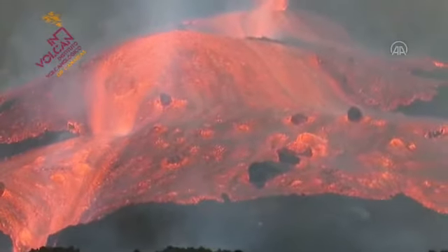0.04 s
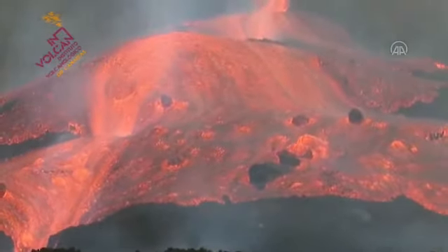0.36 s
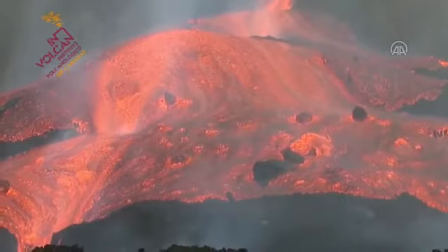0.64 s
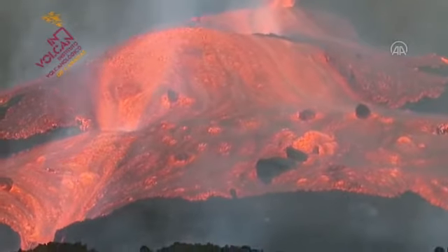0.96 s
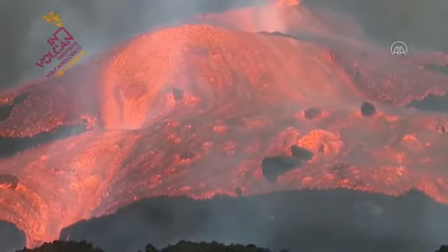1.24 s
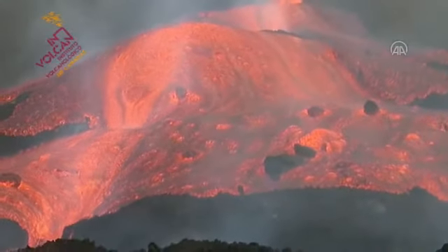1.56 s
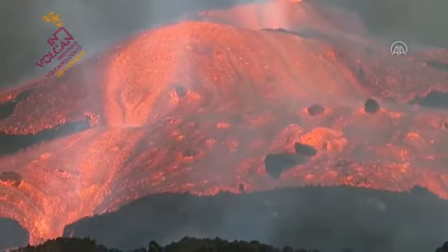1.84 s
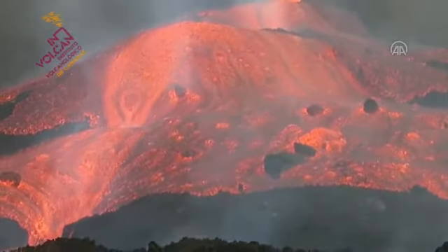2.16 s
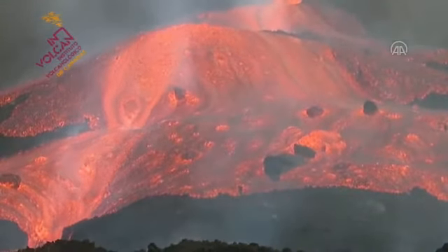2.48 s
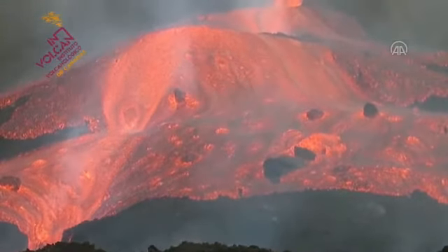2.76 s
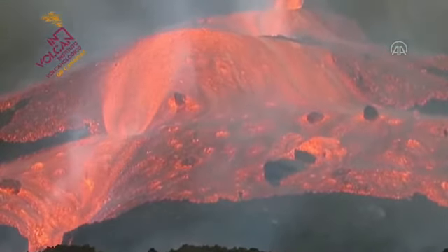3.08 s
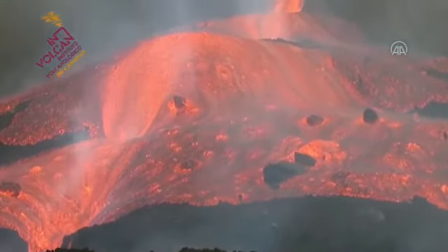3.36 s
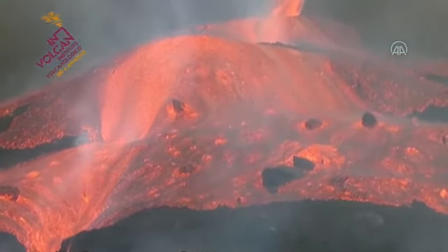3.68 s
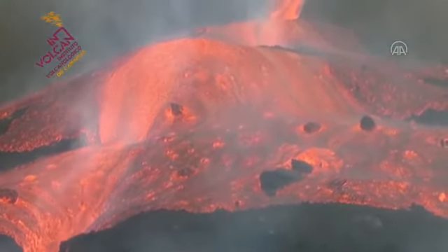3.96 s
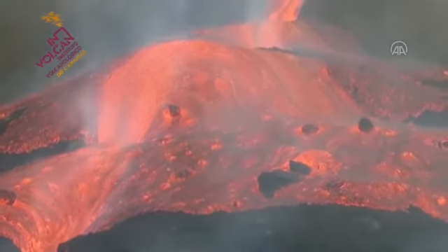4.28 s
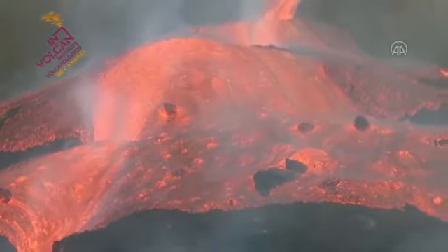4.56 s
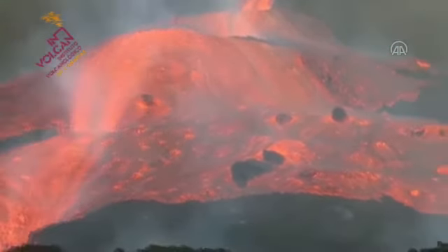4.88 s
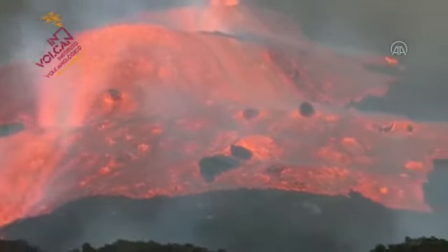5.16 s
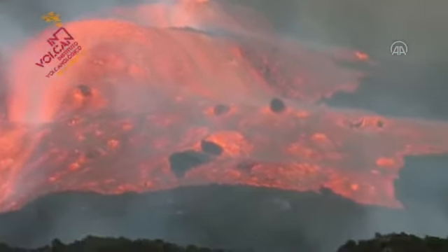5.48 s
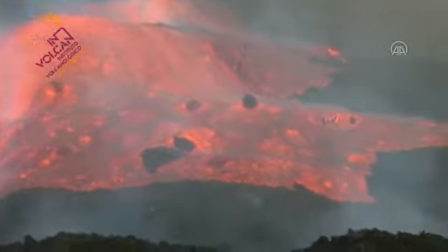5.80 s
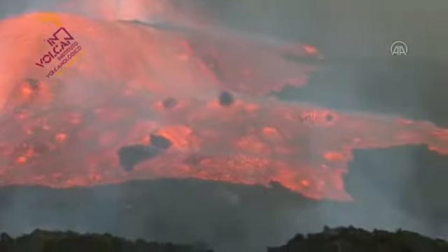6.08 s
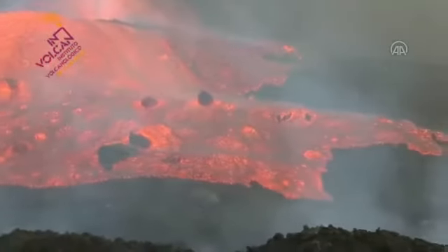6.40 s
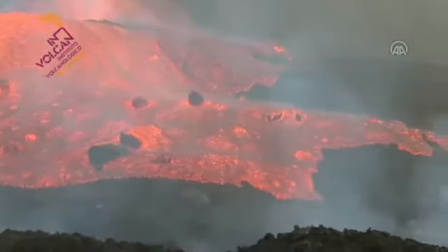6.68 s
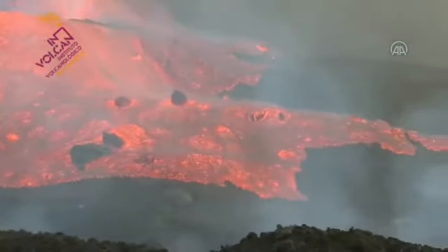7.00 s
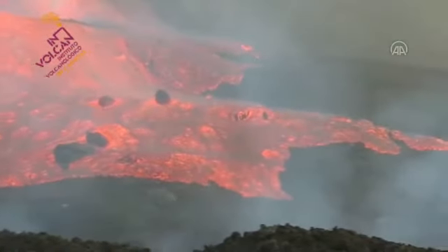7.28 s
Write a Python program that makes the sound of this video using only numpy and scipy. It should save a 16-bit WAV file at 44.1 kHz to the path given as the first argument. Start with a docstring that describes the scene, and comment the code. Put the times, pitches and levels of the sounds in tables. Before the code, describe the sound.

A distant volcano roars in uneven surges over a steady low rumble and thin hiss, with faint dry ticks close by.

```python
"""Across a valley, far from a volcanic vent behind a lava flow, a gas jet is heard roaring in surges.
Its turbulence carries small shocks: large eddies boom, middling ones roar and fine ones rasp. The air
absorbs the treble, and reflections cancel narrow bands. A steady rumble and a thin hiss lie beneath.
Close by, small fractures give faint dry ticks and one gritty snap. Three pressure pulses sound as
soft low thumps, two of them in the lull between surges."""
import sys
import numpy as np
from scipy import signal
from scipy.fft import rfft, irfft
from scipy.io import wavfile

SR = 44100
rng = np.random.default_rng(int(sys.argv[2]) if len(sys.argv) > 2 else 0)


def master_out(mix):
    """Clip the mix to full scale and print it as 16-bit PCM to the path in sys.argv[1]."""
    frames = np.transpose(np.atleast_2d(mix))
    ceiling = np.clip(frames, -1, 1)
    pcm = np.round(ceiling * 32767).astype(np.int16)
    wavfile.write(sys.argv[1], SR, pcm)


N = 332514
TIME, FREQS = np.arange(N) / SR, np.fft.rfftfreq(N, 1 / SR)

# Smooth spectrum of the jet after air absorption: frequency_hz, relative_db
JET_SPECTRUM = [(50, -22.5), (122, -11.5), (160, -4.5), (190, 1.5), (280, 1.1), (420, 3), (560, 3.5),
                (780, -2), (920, -3), (1200, -5), (1700, -14), (2350, -18), (3550, -29), (3900, -37.5),
                (5200, -47), (9000, -84.5)]
# Notches where reflections cancel the direct sound: centre_hz, width_hz, depth_db
INTERFERENCE_DIPS = [(225, 28, 4), (336.6, 54, 6.5), (464, 22, 2.5), (611, 16, 2.5), (740, 68, 4),
                     (1043.5, 79, 7.5), (1547, 62, 3.5), (1917, 110, 2), (2750, 91, 1.5), (3220, 49, 8)]
# Gushes of gas: crest_s, roar_db, swell_s, fade_s, boom_over_roar_db, rasp_over_roar_db
GAS_SURGES = [(0, -32, .2, 1, 1.8, -3), (.735, -29, 0.24, 0.26, -6, -6), (.87, -31.5, 0.16, 0.35, 0, -0.5),
              (1.16, -29, 0.17, 0.32, 0.3, -5.5), (1.335, -23.5, 0.081, 0.13, 1.5, -5),
              (1.42, -21.5, 0.11, 0.13, -5, -8.5), (1.56, -27.5, 0.19, 0.26, 3, -5),
              (1.78, -28, 0.16, 0.85, -1, -6.5), (2.44, -27, 0.096, 0.073, -6.5, -20),
              (2.613, -25, 0.11, 0.06, 0.5, -8.5), (2.79, -24, 0.25, 0.37, -1.5, -7),
              (3.11, -25.5, 0.066, 0.051, -2, -6), (3.48, -27, 0.53, 0.17, -6, -4),
              (4.06, -31.5, 0.78, 0.23, -0.9, -5.5), (4.36, -28, 0.18, 0.53, -4, -0.1),
              (4.78, -24.5, 0.13, 0.14, -7, -2), (5.0, -28.5, 0.31, 0.38, -5, -2.7),
              (6.16, -45.5, 0.11, .04, 6, -16), (6.66, -48, .025, 0.063, 15.5, -26),
              (6.82, -39, 0.07, 0.11, 6, 1), (6.91, -24, 0.04, 0.12, -3, -7.5),
              (7.066, -25.5, 0.11, 0.07, 1, -4.5), (7.146, -22.5, 0.068, 0.072, -4, -3.3),
              (7.475, -24.5, 0.29, 0.63, -6, -2)]
# Spectrum of the ground rumble: frequency_hz, relative_db
RUMBLE_SPECTRUM = [(12, -29), (27, -10.5), (38, -3), (55, 3), (75, 2.5), (120, 1.5), (160, 6.5), (260, -16),
                   (600, -74)]
# Spectrum of the hiss: frequency_hz, relative_db
HISS_SPECTRUM = [(500, -7.5), (2800, 8.5), (4500, 3), (6500, 1), (9700, -0.5), (10100, -49.5), (11000, -36)]
# Level contour of the hiss: time_s, level_db
HISS_CONTOUR = [(0, -54), (.35, -56.5), (1, -54), (3.4, -54.5), (3.8, -55.5), (4.5, -54), (5.3, -56.5),
                (5.7, -57), (6.2, -55), (6.45, -60), (6.9, -54.5), (7.54, -59)]
# Small fractures nearby: start_s, peak_db, centre_hz, width_octaves, decay_s
FRACTURE_TICKS = [(.178, -36, 7500, 0.51, 0.0013), (.2075, -37, 8000, .9, .003),
                  (.403, -33, 8460, 0.69, .001), (.766, -39, 7940, .18, .0035),
                  (2.718, -39, 7200, 0.36, 0.0018), (2.9055, -40, 7360, 0.22, .003),
                  (3.228, -42, 9500, 0.29, .005), (3.4428, -37.5, 7400, 0.2, .001),
                  (3.584, -36, 7000, 0.25, 0.0011), (4.121, -36, 6800, 0.29, 0.00092),
                  (4.2092, -40, 6000, 0.28, .0006), (4.92, -31.5, 6800, 0.38, 0.0008),
                  (5.0412, -35, 6000, .36, .0005), (5.3044, -22, 10500, 0.08, 0.001),
                  (5.3255, -29, 6700, .3, .0008), (5.451, -41, 8450, 0.5, .003),
                  (5.543, -33, 8800, 0.48, 0.00099), (5.8353, -28, 5540, 0.15, 0.0003),
                  (5.8358, -27.5, 7200, 0.77, .0005), (6.199, -42, 9940, .34, .003),
                  (6.268, -36, 8100, 0.55, 0.002), (6.692, -33, 7560, 0.87, 0.0027),
                  (6.738, -42, 9500, 0.35, .003), (7.262, -37.5, 6800, 0.28, .0005),
                  (7.4916, -40, 6800, .24, .0007)]
# Two cracks and a crumbling tail that make one snap: start_s, relative_db, grit_decay_s
SNAP_CRACKS = [(2.6244, -25.5, 0.0024), (2.62655, -29.5, .0018), (2.63, -42, 0.013)]
# Resonances of the snapping object: pitch_hz, relative_db, t60_s
SNAP_MODES = [(2316, 3.5, 0.027), (3810, -11.5, .025), (4540, -9, 0.029), (7570, -3, .018),
              (8730, 0, 0.013), (9600, 1, .012), (10350, 7.5, 0.012)]
# Low pulses of air pressure: centre_s, envelope_db, pitch_hz, half_length_s
PRESSURE_PULSES = [(4.36, -22.5, 170, 0.0039), (6.37, -19.5, 118, 0.0031), (6.415, -12.5, 138, 0.002)]


def gain_of(db):
    """Amplitude grows tenfold for every 20 decibels."""
    return 10 ** (np.asarray(db) / 20)


def unit_rms(x):
    """Normalisation to a mean power of 1."""
    return x / np.sqrt(np.mean(x ** 2) + 1e-20)


def response(spectrum):
    """Frequency response, by interpolation of decibels over log frequency."""
    hz, db = np.transpose(spectrum)
    return gain_of(np.interp(np.log(FREQS + 1), np.log(hz), db))


def filtered(x, gains):
    """Linear filtering: each frequency is multiplied by its own gain."""
    return irfft(rfft(x) * gains, N)


def waver(cutoff_hz):
    """Random modulation: low-passed noise of rms 1."""
    return unit_rms(filtered(rng.standard_normal(N), np.exp(-(FREQS / cutoff_hz) ** 2)))


def add(mix, start_s, sound):
    """Superposition: a sound adds to the mix from start_s on."""
    part = mix[round(start_s * SR):][:len(sound)]
    part += sound[:len(part)]


def surge(crest_s, level_db, swell_s, fade_s, roundness=1.26):
    """Amplitude envelope of one gush of gas; roundness 1 gives a pointed crest, 2 a bell."""
    t = TIME - crest_s
    from_crest = np.minimum(abs(t) / np.where(t < 0, swell_s, fade_s), 10)
    return gain_of(level_db) * np.exp(-from_crest ** roundness)


def gas_jet(shock_share=0.15, shocks_per_s=400, flutter_db=0.77, flutter_hz=20):
    """Turbulent jet noise: larger eddies radiate lower frequencies, and incoherent surges add in power."""
    sizes = gain_of(2 * np.minimum(rng.exponential(1, N), 4))
    shocks = unit_rms(sizes * rng.choice([-1, 1], N) * (rng.random(N) < shocks_per_s / SR))
    source = np.sqrt(1 - shock_share) * rng.standard_normal(N) + np.sqrt(shock_share) * shocks
    dips_db = sum(db * np.exp(-((FREQS - hz) / width) ** 2) for hz, width, db in INTERFERENCE_DIPS)
    path = response(JET_SPECTRUM) * gain_of(-dips_db)
    below_roar, below_rasp = (1 / (1 + (FREQS / hz) ** 10) for hz in (330, 1050))
    bands = below_roar, below_rasp - below_roar, 1 - below_rasp  # boom, roar, rasp
    idle_db = [-40, -42.5, -48]  # the same three bands between surges
    powers = gain_of(idle_db)[:, None] ** 2
    for *shape, boom_db, rasp_db in GAS_SURGES:
        powers = powers + np.outer(gain_of([boom_db, 0, rasp_db]), surge(*shape)) ** 2
    voices = (unit_rms(filtered(source, path * band)) for band in bands)
    jet = sum(voice * np.sqrt(power) for voice, power in zip(voices, powers))
    return jet * gain_of(flutter_db * waver(flutter_hz))


def ground_rumble(level_db=-39.5, swell_db=1.45, swell_hz=3):
    """Low-frequency noise under slight amplitude modulation, continuing through the lull."""
    noise = unit_rms(filtered(rng.standard_normal(N), response(RUMBLE_SPECTRUM)))
    return noise * gain_of(level_db + swell_db * waver(swell_hz))


def hiss(sizzle_db=1.64, sizzle_hz=30, crackle_db=-67, crackles_per_s=60):
    """Modulated broadband noise hisses; sparse random impulses of the same spectrum crackle."""
    colour = response(HISS_SPECTRUM)
    level_db = np.interp(TIME, *np.transpose(HISS_CONTOUR)) + sizzle_db * waver(sizzle_hz)
    noise = unit_rms(filtered(rng.standard_normal(N), colour))
    sizes = gain_of(-3 * np.minimum(rng.exponential(1, N), 3))
    impulses = sizes * (rng.random(N) < crackles_per_s / SR)
    return gain_of(level_db) * noise + gain_of(crackle_db) * unit_rms(filtered(impulses, colour))


def dry_ticks():
    """Acoustic emission: each fracture releases a decaying burst of noise in its own band."""
    out, t = np.zeros(N), np.arange(2048) / SR
    octave = np.log2(np.fft.rfftfreq(len(t), 1 / SR) + 1)
    for start_s, peak_db, centre_hz, width_octaves, decay_s in FRACTURE_TICKS:
        burst = rng.standard_normal(len(t)) * np.exp(-t / decay_s)
        burst = np.roll(burst, len(t) // 2)  # centred, as the filter spreads it both ways
        band = np.exp(-.5 * ((octave - np.log2(centre_hz)) / width_octaves) ** 2)
        tick = irfft(rfft(burst) * band)
        add(out, start_s - t[-1] / 2, gain_of(peak_db) * tick / abs(tick).max())
    return out


def snap(rise_s=0.0005, ring_gain_db=-1.5, grains_per_s=5000, grit_width_hz=240):
    """Damped resonance: a small hard object cracks, rings briefly and sheds grit of the same colour."""
    rings, grit, t = np.zeros(N), np.zeros(N), np.arange(SR // 10) / SR
    ring = sum(gain_of(db - 60 * t / t60) * np.sin(2 * np.pi * hz * t) for hz, db, t60 in SNAP_MODES)
    for start_s, relative_db, grit_decay_s in SNAP_CRACKS:
        onset = gain_of(relative_db) * (1 - np.exp(-t / rise_s))
        grains = unit_rms(rng.choice([-1., 1.], len(t)) * (rng.random(len(t)) < grains_per_s / SR))
        add(grit, start_s, onset * grains * np.exp(-t / grit_decay_s))
        add(rings, start_s, onset * ring)
    body = sum(gain_of(db) * np.exp(-.5 * ((FREQS - hz) / grit_width_hz) ** 2) for hz, db, _ in SNAP_MODES)
    return gain_of(ring_gain_db) * rings + filtered(grit, unit_rms(body))


def thumps():
    """Pressure transients: a short Gaussian envelope leaves one swing of a sine, with no ring."""
    out = np.zeros(N)
    for centre_s, envelope_db, pitch_hz, half_length_s in PRESSURE_PULSES:
        t = TIME - centre_s
        envelope = gain_of(envelope_db) * np.exp(-.5 * (t / half_length_s) ** 2)
        out += envelope * np.sin(2 * np.pi * pitch_hz * t)
    return out


def scene():
    """Superposition of the far volcano and the small near sounds in one channel."""
    return (gas_jet() + ground_rumble() + hiss() + dry_ticks() + snap() + thumps())[None]


def record(dry):
    """Band limiting: a steep low-pass filter removes the highest treble."""
    low_pass = signal.firwin(511, cutoff=10700, window=("kaiser", 9), fs=SR)
    return signal.oaconvolve(dry, low_pass[None], "same")


dry = scene()
out = record(dry)
master_out(out)
```